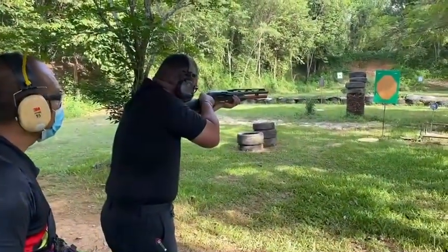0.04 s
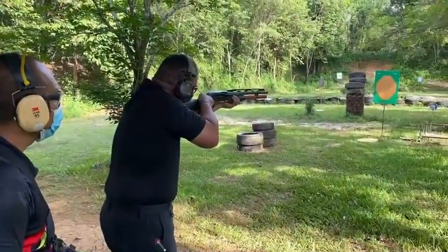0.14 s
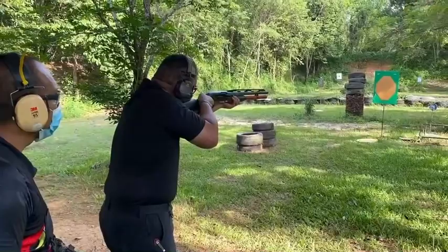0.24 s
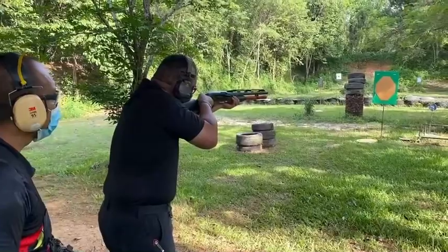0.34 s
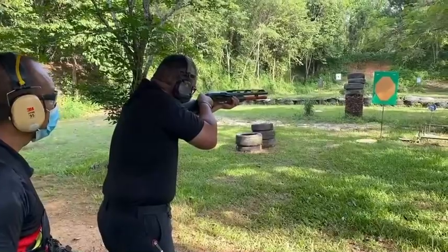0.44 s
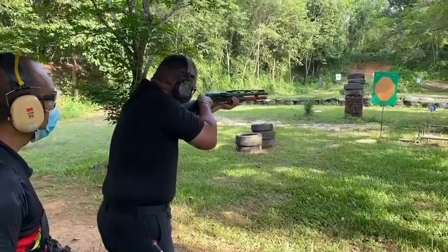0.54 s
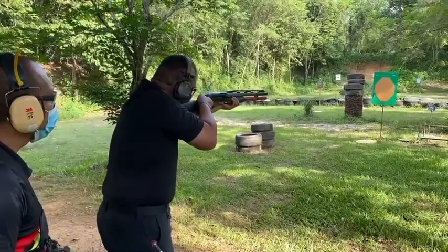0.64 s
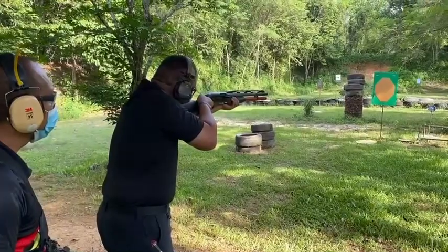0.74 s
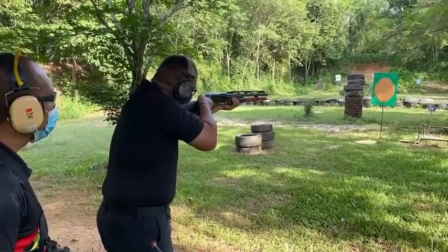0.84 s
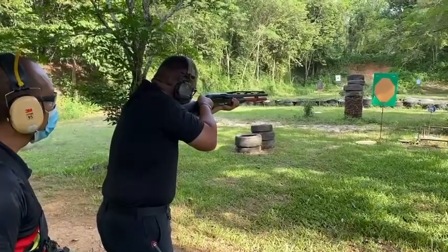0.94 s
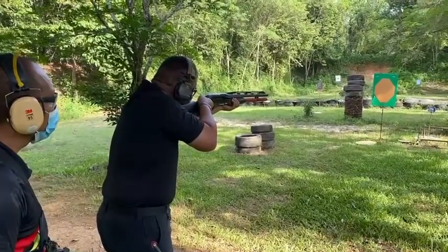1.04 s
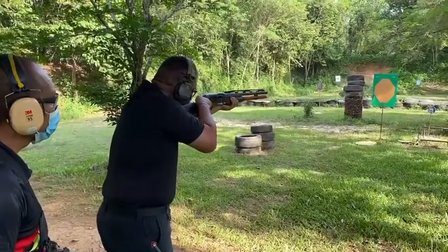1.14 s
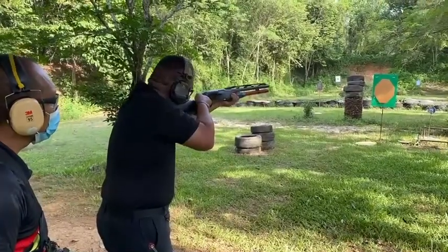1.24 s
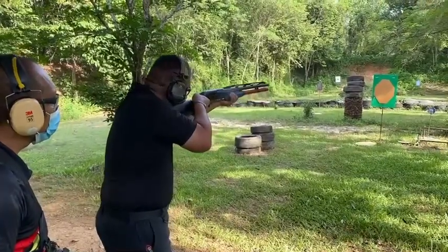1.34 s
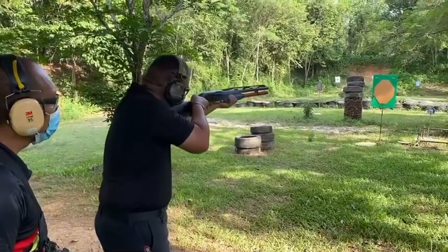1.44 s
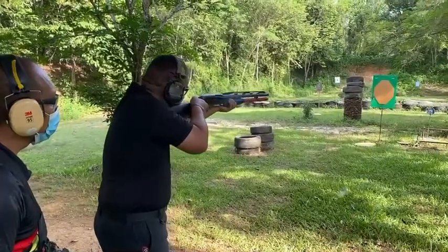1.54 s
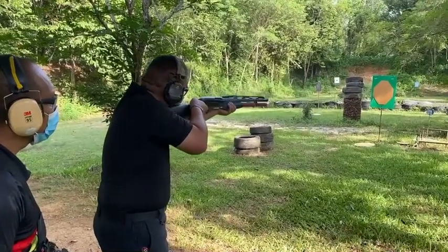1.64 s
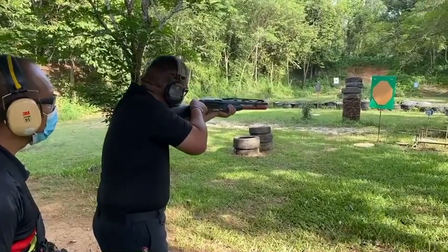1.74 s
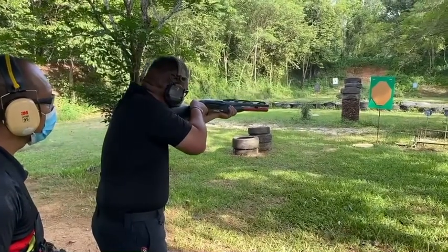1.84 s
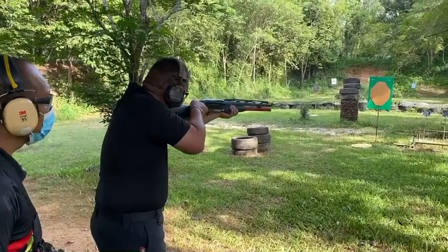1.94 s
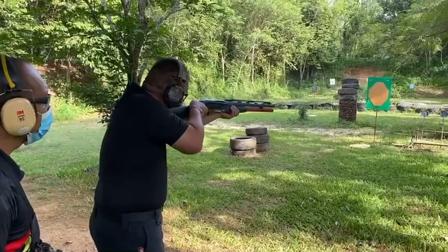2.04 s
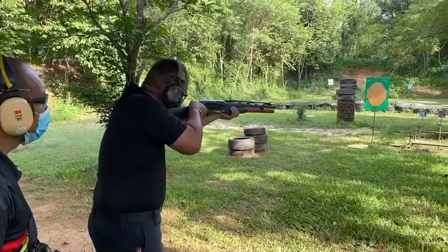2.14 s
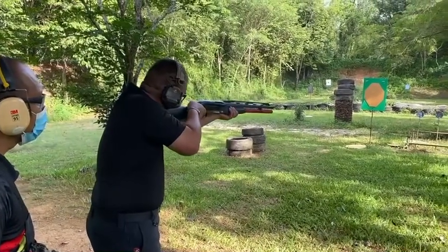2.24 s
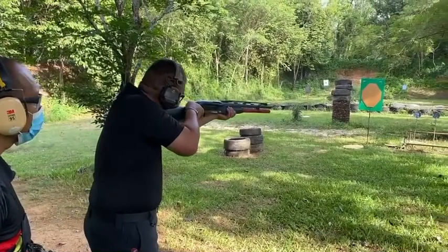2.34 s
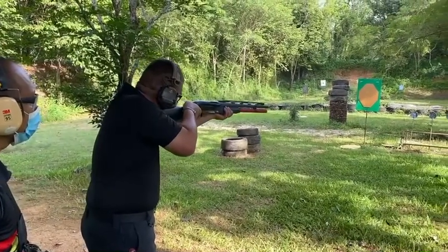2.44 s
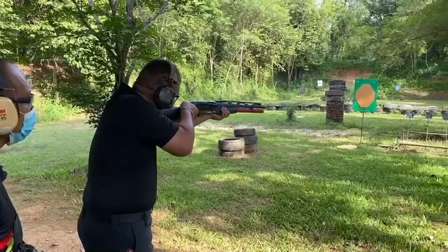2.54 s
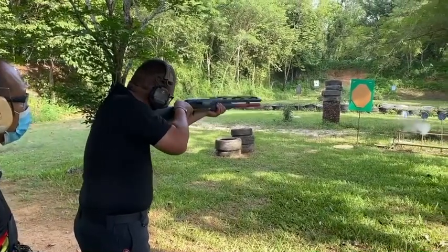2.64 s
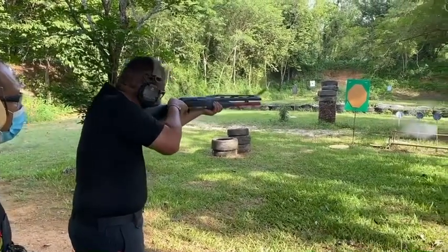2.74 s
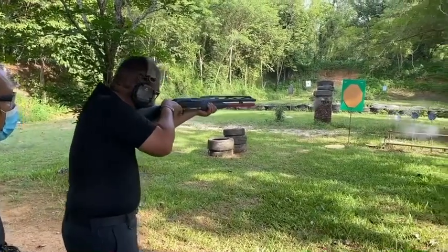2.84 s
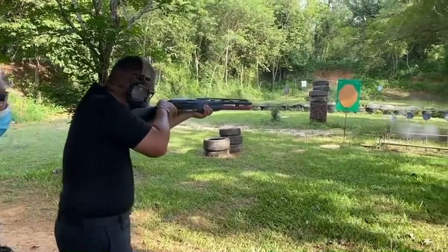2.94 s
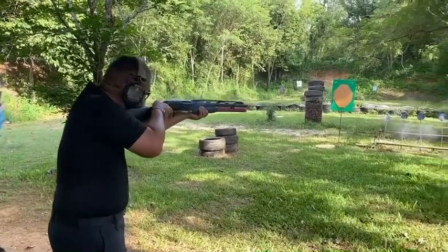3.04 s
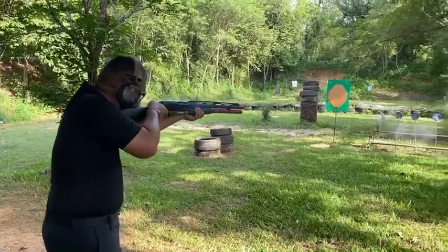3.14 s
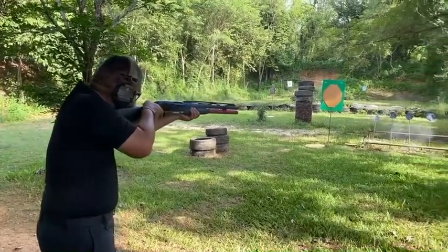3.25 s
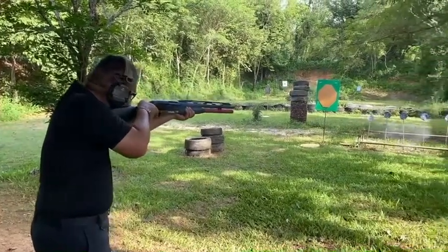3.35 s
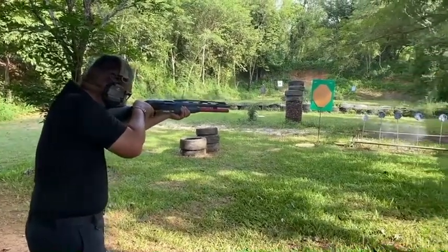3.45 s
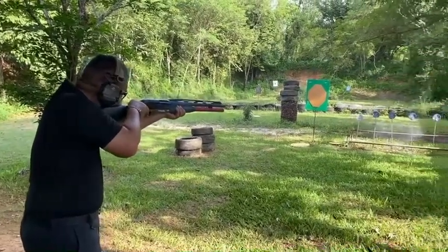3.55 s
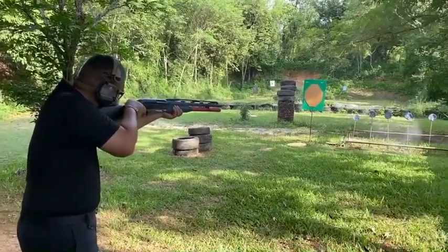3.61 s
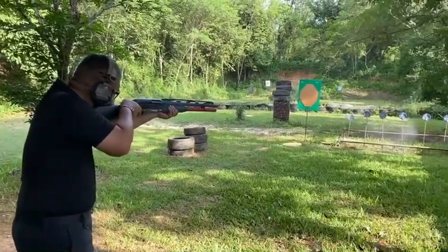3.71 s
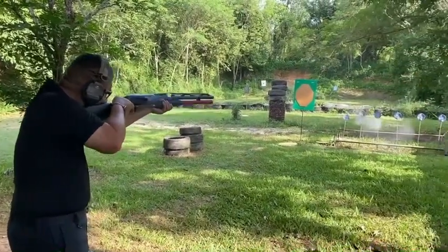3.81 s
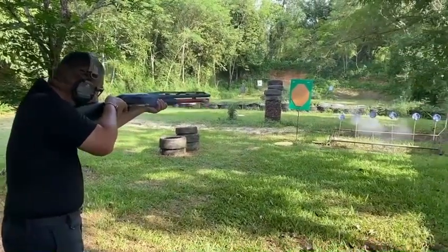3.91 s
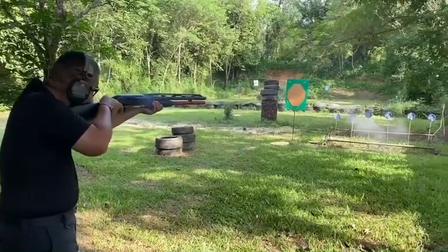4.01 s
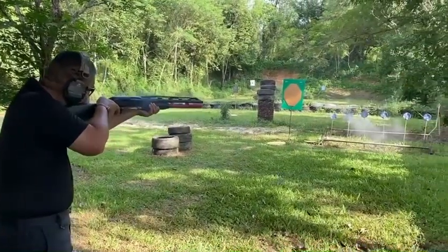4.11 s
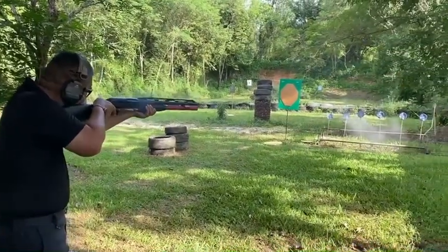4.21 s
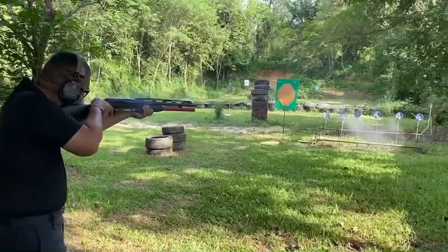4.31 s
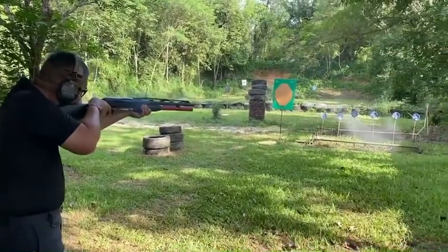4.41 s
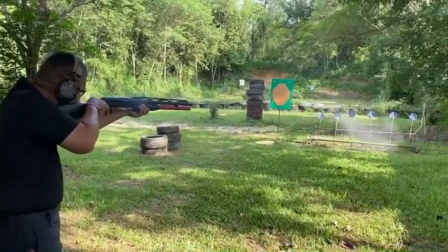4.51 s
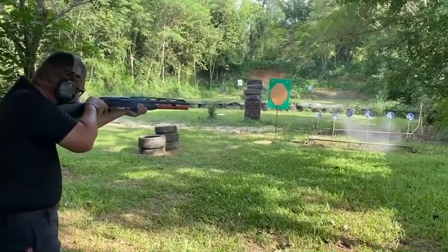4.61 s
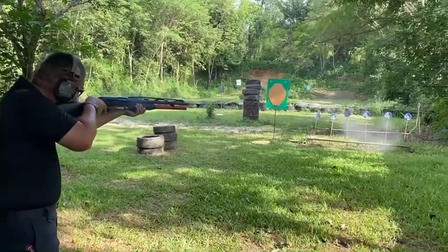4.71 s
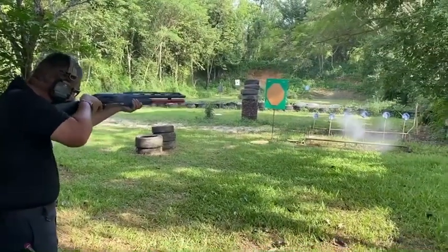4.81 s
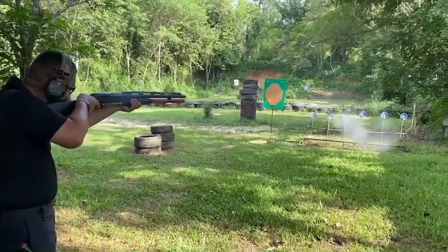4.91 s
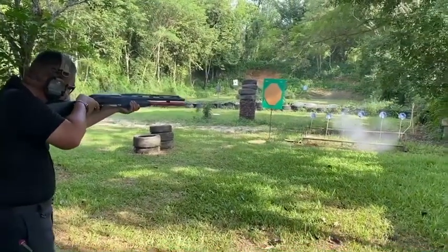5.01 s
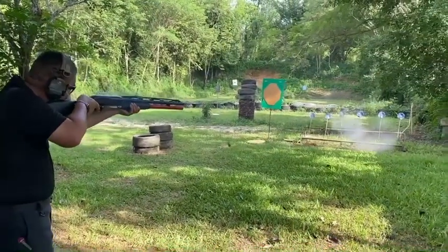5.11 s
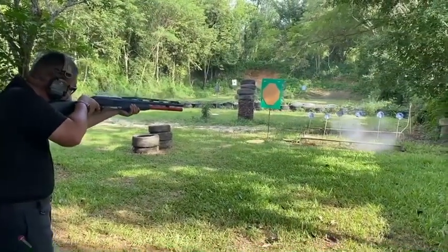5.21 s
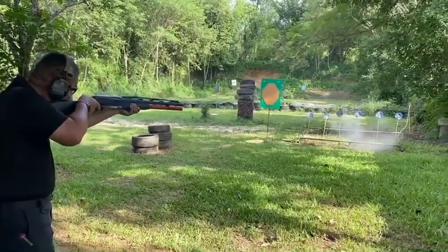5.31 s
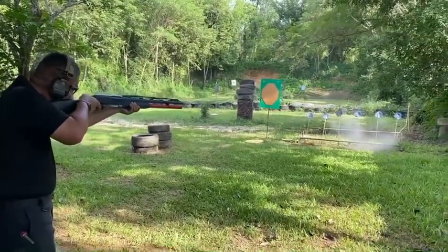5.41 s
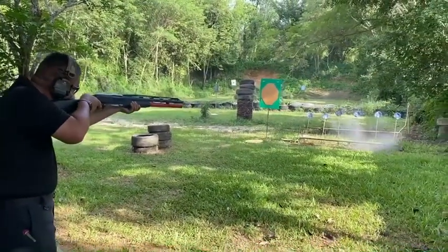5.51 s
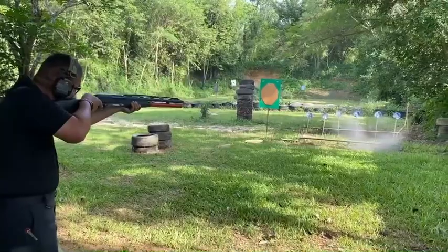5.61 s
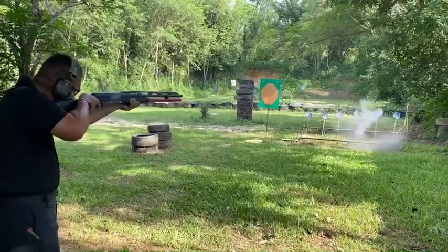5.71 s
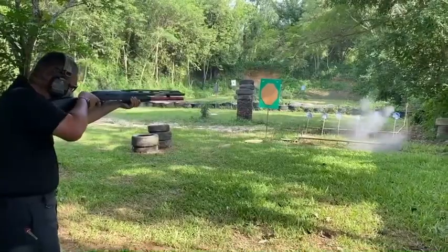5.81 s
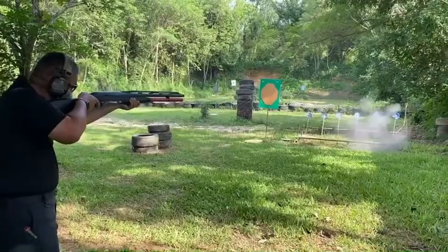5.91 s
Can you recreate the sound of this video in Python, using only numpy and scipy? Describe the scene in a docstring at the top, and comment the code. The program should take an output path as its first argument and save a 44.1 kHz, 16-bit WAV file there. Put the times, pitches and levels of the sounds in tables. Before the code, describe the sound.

Outdoors and close by, a shotgun fires five times; hard cracks scatter into rough woodland echoes over quiet leaves, insects and low hum.

```python
"""Shotgun on a wooded range

A shotgun fires five times on a grassy range ringed by woods, a few metres from a phone.
Each blast is a muzzle pulse, a low thump and a wash of shaped noise off ground, bank and trunks.
Steel plates ring as pairs of dying sines; small rattles are a tick and a noise burst.
Filtered noise makes leaves and traffic, insects and a far note; a wavering sine makes an engine hum.
The phone's gain control drops for the blasts and only creeps back."""
import sys
import numpy as np
from scipy import signal
from scipy.fft import rfft, irfft, next_fast_len
from scipy.io import wavfile
from scipy.ndimage import uniform_filter1d, minimum_filter1d

SR = 44100
rng = np.random.default_rng(int(sys.argv[2]) if len(sys.argv) > 2 else 0)


def file_out(sig):
    """Save sig as 16-bit WAV at sys.argv[1]."""
    # one column per channel
    cols = np.atleast_2d(sig).T
    # limit, then scale
    lim = np.clip(cols, -1, 1)
    pcm = np.round(lim * 32767).astype(np.int16)
    wavfile.write(sys.argv[1], SR, pcm)


N = 263056  # samples

# The five shots, parts relative to their blast: start_s, blast_db, rise_ms (at 1 kHz), crack_db,
# boom_db, bank_slap_db, woods_db, far_woods_db, plate_brightness_db_per_octave (above 750 Hz)
SHOT_LIST = [(1.016, 12, 7.65, -2, -3, -8, -2, 3, -18), (2.477, 22, 3.14, -4.5, -3, -12, 0.5, -2, 2),
             (3.613, 15.5, 3.3, -3, -24, -3, 5, 1, 2), (4.625, 18, 2.9, -0.5, -12.5, -3, 3.5, 0, 3.5),
             (5.553, 13, 3.5, 0, -29, 2.5, 8, 1, -0.5)]
EARLY_S = .04  # sound is laid out from this long before each shot


def shots():
    """Each shot sums scattered noise, direct pulses, a bank echo and plate ring at its own balance."""
    out, n = np.zeros((2, N)), 2 ** 16
    t = np.arange(n) / SR - EARLY_S
    for s, db, rise_ms, crack_db, boom_db, slap_db, woods_db, far_db, bright_db in SHOT_LIST:
        sound = scatter(t, rise_ms, woods_db, far_db)
        # the short sounds all end within this stretch
        head, u = sound[:, :2 ** 13], t[:2 ** 13]
        head += muzzle_crack(u, crack_db)
        head += gas_thump(u, boom_db)
        head += bank_slap(u, slap_db)
        # the plates keep their own level, however loud the blast
        sound += undb(-db) * plates(t, bright_db)
        add(out, s - EARLY_S, undb(db) * sound)
    return out


# Blast spectrum: pitch_hz, density_db (per Hz)
BLAST_COLOUR = [(30, -13.5), (162, -1.5), (547, -7), (977, -4), (1340, -5.5), (2740, -11.5), (8000, -17),
                (8550, -31), (9100, -12), (11000, -18.5), (11700, -46.5), (12800, -45), (13400, -35),
                (15200, -33), (15700, -69.5)]
# Extra loss in air and leaves, negative where the sound lingers: pitch_hz, loss_db_per_s (of delay)
PATH_LOSS = [(50, 7.5), (150, 5), (600, -11), (2000, 5), (6000, 12), (12000, 30), (16000, 42.5)]
# Likeness of the two microphone ports: pitch_hz, likeness (0-1)
PORT_LIKENESS = [(60, .93), (250, .86), (500, .7), (1000, .6), (2000, .7), (4000, .65), (8000, .88),
                 (12000, .96)]
# Phase lead of the left port: pitch_hz, lead_rad
PORT_LEAD = [(100, 0.2), (500, -0.42), (1100, -2.1), (2000, -0.4), (4000, 0.61), (7000, 0.39), (8600, -2.1),
             (12000, -0.79)]
# Stereo lean of the blast: pitch_hz, left_minus_right_db
STEREO_LEAN = [(60, 0.5), (110, 0.5), (200, 0), (380, 0), (700, 0), (1290, -1.5), (2380, 1.5), (4400, 4),
               (8120, 0), (15000, 1)]


def scatter(t, rise_ms, woods_db, far_db):
    """Many trunks return the blast as a dense noisy crackle whose treble is lost along longer paths."""
    n = len(t)
    hz = np.fft.rfftfreq(n, 1 / SR)
    late, before = np.clip(t, 0, None), np.clip(t, None, 0)
    grains = rng.standard_normal((2, n)) * undb(3.3 * rng.standard_normal((2, n)))
    colour = undb(by_hz(BLAST_COLOUR, hz) + np.array([[.5], [-.5]]) * by_hz(STEREO_LEAN, hz))
    spectrum = colour * ports(*rfft(grains), by_hz(PORT_LIKENESS, hz), by_hz(PORT_LEAD, hz))
    spectrum /= np.sqrt(np.mean(irfft(spectrum, n) ** 2))
    near = undb(near_db(late) + woods_db * np.clip(late / .014, 0, 1))
    # a shot into deeper woods comes back both stronger and more drawn out
    far = undb(far_db) * far_gain(late / (1 + 0.023 * far_db))
    fade_in = (1 - (before / EARLY_S) ** 2) ** 2
    # clumps of trees make the return lumpy, less so in the treble
    clumps_db = 2.1 * lumps(45, n)
    crackle = np.zeros((2, n))
    for f, window in bands(n):
        # treble rises faster
        rise = np.exp(-(-before * 1000 / rise_ms * (f / 1000) ** 0.18) ** 1.046)
        uneven_db = (clumps_db + 2.7 * lumps(22, n)) / (1 + f / 4000)
        crackle += irfft(spectrum * window, n) * rise * undb(uneven_db - by_hz(PATH_LOSS, f) * late)
    return np.hypot(near, far) * fade_in * crackle


SLAP_S, SLAP_HZ, SLAP_PAN_DB = .043, 1140, -4.5  # pan is left minus right
SPREAD_S, SPREAD_DB_PER_DECADE, BANK_DB, BANK_WIDTH_S = .03, 31, 4.5, 0.0091
CLEARING_S, CLEARING_END_DB_S = 0.33, 223


def near_db(late):
    """Near scatter thins as it spreads, swells where the bank stands and ends with the clearing."""
    bank = BANK_DB * np.exp(-((late - SLAP_S) / BANK_WIDTH_S) ** 2)
    spread = SPREAD_DB_PER_DECADE * np.log10(1 + late / SPREAD_S)
    return bank - spread - CLEARING_END_DB_S * np.clip(late - CLEARING_S, 0, None)


FAR_S, FAR_DB, FAR_RISE_DB_S, FAR_FALL_DB_S = 0.29, -28, 55.5, 60.5
ROLL_DB, ROLL_FALL_DB_S = -43, 30.5


def far_gain(late):
    """Far woods swell to a peak, then die away over a fainter, longer roll."""
    after, ahead = np.clip(late - FAR_S, 0, None), np.clip(FAR_S - late, 0, None)
    peak = undb(FAR_DB - FAR_FALL_DB_S * after)
    roll = undb(ROLL_DB - ROLL_FALL_DB_S * after)
    return undb(-FAR_RISE_DB_S * ahead) * np.hypot(peak, roll)


# Muzzle pulse and its first bounces: delay_s, level_db, pitch_hz
MUZZLE_PULSES = [(0, 2, 1830), (.0075, -9.5, 912), (.021, -9.5, 1000.)]
# Brief ring of gun and ground, also used for the bank echo: pitch_hz, level_db, t60_s
GUN_MODES = [(540, -3.5, 0.048), (960, -3, 0.058), (1290, -11, 0.088), (2030, -7.5, 0.084)]


def muzzle_crack(t, crack_db):
    """Sharp pressure pulses, each ringing gun and ground in slightly scattered modes."""
    out = np.zeros((2, len(t)))
    for delay, bounce_db, pulse_hz in MUZZLE_PULSES:
        gain = undb(crack_db + bounce_db)
        out += gain * 2 * n_wave(t - delay, pulse_hz)
        for hz, mode_db, t60 in GUN_MODES:
            hz = hz * (1 + 0.051 * rng.standard_normal())
            mode_db = mode_db + 2.9 * rng.standard_normal()
            ring = swing(t - delay, hz, t60) * pan(3.3 * rng.standard_normal())
            out += gain * undb(mode_db) * ring
    return out


THUMP_S, THUMP_DB, THUMP_HZ, THUMP_T60 = 0.0026, 2, 275, .06
BOOM_HZ, BOOM_T60 = 99, 0.073


def gas_thump(t, boom_db):
    """The gas ball collapses in a few low swings: a thump and a deeper boom."""
    thump = undb(THUMP_DB) * swing(t - THUMP_S, THUMP_HZ, THUMP_T60)
    return thump + undb(boom_db) * swing(t - THUMP_S, BOOM_HZ, BOOM_T60)


def bank_slap(t, slap_db):
    """The earth bank returns a double pulse with a short rough tail and the gun's ring."""
    after = t - SLAP_S
    cycles = np.clip(after, 0, None) * SLAP_HZ
    rough = 0.7 * cycles * np.exp(-cycles / 3.3) * narrow(SLAP_HZ, 1600., len(t))
    pulses = 2 * n_wave(after, SLAP_HZ) + 1.3 * n_wave(after - .0035, SLAP_HZ)
    ring = sum(undb(mode_db + 1.5) * swing(after, hz, t60) for hz, mode_db, t60 in GUN_MODES)
    return undb(slap_db) * pan(SLAP_PAN_DB) * (pulses + rough + ring)


# What rings on after a shot: pitch_hz, level_db, t60_s
PLATE_MODES = [(110, -5.5, 1.9), (232, 4.5, 0.87), (758, -1.5, 1.91), (1000, -6, 0.46), (1500, -3, 0.35),
               (2130, 2.5, 0.24), (3560, -2.5, 0.92), (4667, -23.5, .7)]
PLATE_S, PLATE_DB = 0.1, -18.5  # pellets fly out, the ring comes back


def plates(t, bright_db):
    """Struck steel rings in close pairs of modes that beat slowly, brighter on some shots."""
    out = np.zeros((2, len(t)))
    build_up = 1 - np.exp(-np.clip(t, 0, None) / .15)  # the ring builds up in the woods
    for hz, mode_db, t60 in PLATE_MODES:
        pair = swing(t - PLATE_S, hz, t60) + .4 * swing(t - PLATE_S, hz + rng.uniform(2, 6), t60)
        # the swinging plate turns to and fro
        pair *= undb(1.8 * lumps(25, len(t))) * build_up
        tilt_db = bright_db * np.log2(max(hz / 750, 1))
        out += undb(PLATE_DB + mode_db + tilt_db) * pair * pan(-1.0)
    return out


# Small things falling and rattling between shots:
# start_s, level_db, centre_hz, t60_s, left_minus_right_db
RATTLE_LIST = [(1.958, -48, 5000, 0.46, 0), (4.314, -24.5, 2200, 0.028, -0.5),
               (4.328, -29.5, 3440, 0.37, 4.5), (4.455, -37, 1500, .097, -1),
               (4.487, -39.5, 2310, 0.28, 12), (5.339, -31.5, 1970, 0.027, -1.5)]
RATTLE_WIDTH = 1.8  # band width over centre
TICK_DB, TICK_HZ, TICK_T60 = 8, 1380, 0.02  # tick level is against its rattle


def rattles():
    """First contact rings briefly as a tick, under a short burst of uneven noise grains."""
    out, n = np.zeros((2, N)), 2 ** 14
    t = np.arange(n) / SR
    for s, db, hz, t60, pan_db in RATTLE_LIST:
        width = RATTLE_WIDTH * hz
        sides = np.array([narrow(hz, width, n), narrow(hz, width, n)])
        burst = narrow(hz, width, n) + .5 * sides
        shape = (1 - np.exp(-t * 90 / t60)) * undb(db - 60 * t / t60 + 0.82 * lumps(150, n))
        tick = undb(db + TICK_DB) * swing(t, TICK_HZ, TICK_T60)
        add(out, s, (burst * shape + tick) * pan(pan_db))
    return out


# Insect chorus: pitch_hz, width_hz, level_db, change_db (from the first shot on)
INSECT_BANDS = [(2300, 170, -70, 1), (4850, 330, -76, -2), (7960, 330, -74.5, -3), (9170, 390, -66.5, 4.5),
                (9620, 79, -59, -6), (9800, 160, -73.5, -3.5)]
# One soft far note, perhaps a dove: centre_s, half_length_s, pitch_hz, level_db
DOVE_NOTE = (.77, .045, 520., -58)


def wildlife():
    """Insects sing in narrow wavering noise bands, some hushing at the first shot; one far note coos."""
    out = np.zeros((2, N))
    startled = np.arange(N) / SR > SHOT_LIST[0][0]
    for hz, width, db, change_db in INSECT_BANDS:
        song = narrow(hz, width, N) + .7 * np.array([[1], [-1]]) * narrow(hz, width, N)
        out += undb(db + change_db * startled + 0.73 * walk(15)) * song
    s, half, hz, db = DOVE_NOTE
    t = np.arange(N) / SR - s
    return out + undb(db) * np.exp(-(t / half) ** 2) * narrow(hz, 60., N)


# Background spectrum, relative: pitch_hz, density_db (per Hz)
AIR_COLOUR = [(15, -36), (25, -6), (56, 2), (82, -13), (199, -17), (329, -24), (651, -24.5), (882, -24.5),
              (1320, -33.5), (2360, -34), (3450, -44.5), (4800, -41), (6830, -47.5), (9490, -34.5),
              (10500, -56.5), (13600, -76), (22000, -120)]
# Stereo likeness of the background: pitch_hz, left_right_correlation
AIR_LIKENESS = [(60, 0.97), (200, 0.88), (400, -0.43), (900, -0.11), (2400, 0.18), (8000, 0.39)]
AIR_DB = -50.5  # rms


def air():
    """Distant traffic and leaves: each noise band swells a little with the others and flickers alone."""
    n = next_fast_len(N)
    hz = np.fft.rfftfreq(n, 1 / SR)
    noise = ports(*rfft(rng.standard_normal((2, n))), by_hz(AIR_LIKENESS, hz))
    spectrum = undb(by_hz(AIR_COLOUR, hz)) * (hz > 70) * noise
    swell = walk(1.1)
    out = np.zeros((2, N))
    for _, window in bands(n):
        out += irfft(spectrum * window, n)[:, :N] * undb(.8 * swell + 1.8 * walk(8))
    return level(out, AIR_DB)


# Far engine: pitch_hz, width_hz (of its noise), level_db
ENGINE_HUM = (52., 6.2, -41.5)


def hum():
    """A far engine drones on one low note that wavers in phase and level, with a little noise."""
    hz, width, db = ENGINE_HUM
    t = np.arange(N) / SR
    note = np.sin(2 * np.pi * (hz * t + .25 * walk(4)))
    return undb(db + 1.2 * walk(14)) * (note + .2 * narrow(hz, width, N))


def n_wave(t, hz):
    """One pressure swing up and down around t = 0, lasting about 1 / hz."""
    return -4 * t * hz * np.exp(-4 * (t * hz) ** 2)


def swing(t, hz, t60):
    """A dying sine that starts at t = 0 and falls 60 dB in t60 seconds."""
    u = np.clip(t, 0, None)
    return np.sin(2 * np.pi * hz * u) * undb(-60 * u / t60)


def narrow(hz, width, n):
    """Noise in a bell-shaped band, rms 1."""
    bell = 1 / (1 + (2 * (np.fft.rfftfreq(n, 1 / SR) - hz) / width) ** 4)
    return level(irfft(rfft(rng.standard_normal(n)) * bell, n), 0)


def lumps(rate, n):
    """Random levels every 1 / rate s joined by smoothed lines; spread near 1."""
    steps = np.arange(n) * rate / SR
    lines = np.interp(steps, np.arange(n // 100), rng.standard_normal(n // 100))
    return 1.3 * uniform_filter1d(lines, int(SR / rate / 2))


def walk(rate):
    """Random levels held 1 / rate s and smoothed twice; spread near 1."""
    k = int(SR / rate)
    held = np.repeat(rng.standard_normal(N // k + 1), k)
    return 0.87 * uniform_filter1d(uniform_filter1d(held, k), k)[:N]


def bands(n):
    """Centres and overlapping half-octave windows of an n-point spectrum; they sum to 1 up to 16 kHz."""
    place = 2 * np.log2(np.fft.rfftfreq(n, 1 / SR) + 1)
    return [(2 ** (k / 2), np.clip(1 - abs(place - k), 0, 1)) for k in range(9, 29)]


def ports(one, other, like, lead=0):
    """Left and right spectra from two noises with the given likeness and phase lead."""
    like = np.clip(like, -.99, .99)
    a, b = np.sqrt((1 + like) / 2), np.sqrt((1 - like) / 2)
    left = (a * one + b * other) * np.exp(.5j * lead)
    right = (a * one - b * other) * np.exp(-.5j * lead)
    return np.array([left, right])


def by_hz(table, hz):
    """Table value on a log-frequency axis."""
    f, v = np.transpose(table)
    return np.interp(np.log(hz + 1), np.log(f + 1), v)


def undb(db):
    """Decibels to amplitude."""
    return 10 ** (np.asarray(db) / 20)


def level(x, db):
    """Scale a sound to an rms level."""
    return x * undb(db) / np.sqrt(np.mean(x ** 2))


def pan(db):
    """Left and right gains that differ by db."""
    return undb(np.array([[db], [-db]]) / 2)


def add(out, s, sound):
    """Mix a sound in from time s."""
    i = int(s * SR)
    out[:, i:i + sound.shape[-1]] += sound[..., :N - i]


def scene():
    """Shots and rattles over wildlife, air and hum."""
    return shots() + rattles() + wildlife() + air() + hum()


MIC_LOW_HZ, TOP_HZ = 42, 16000
HOLD_DB, CREEP_DB_S, AHEAD_S = -10.5, 2.5, 0.01


def record(dry):
    """Phone: bass cut, gain control that looks ahead and creeps back, rounded peaks, treble cut."""
    dry = signal.sosfilt(signal.butter(2, MIC_LOW_HZ, "high", fs=SR, output="sos"), dry)
    k, creep = int(AHEAD_S * SR), CREEP_DB_S * np.arange(N) / SR
    loud_db = 10 * np.log10(uniform_filter1d(np.mean(dry ** 2, axis=0), k) + 1e-12)
    ahead_db = -minimum_filter1d(-loud_db, k)  # loudest nearby, so gain drops just before a blast
    # the highest level so far, forgotten at the creep rate; only what tops HOLD_DB is turned down
    held_db = np.maximum(np.maximum.accumulate(ahead_db + creep) - creep, HOLD_DB)
    gain = undb(uniform_filter1d(HOLD_DB - held_db, k))
    wet = np.tanh(.7 * dry * gain) / .7
    return signal.sosfilt(signal.ellip(8, .2, 70, TOP_HZ, fs=SR, output="sos"), wet)


dry = scene()
out = record(dry)
file_out(out)
```